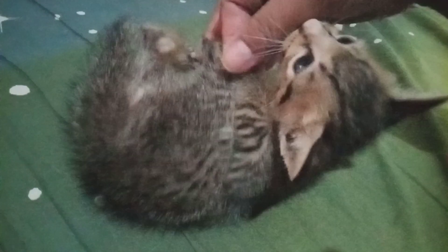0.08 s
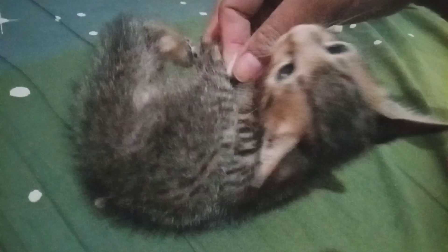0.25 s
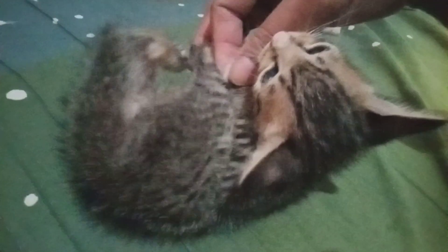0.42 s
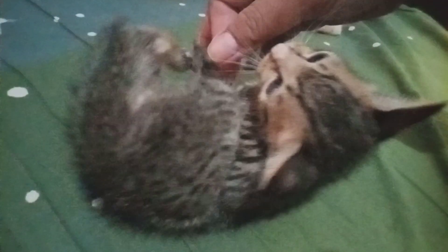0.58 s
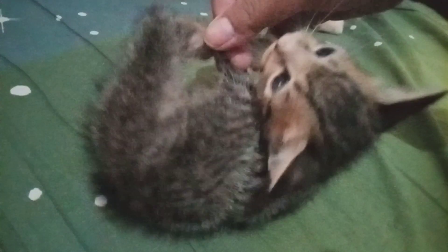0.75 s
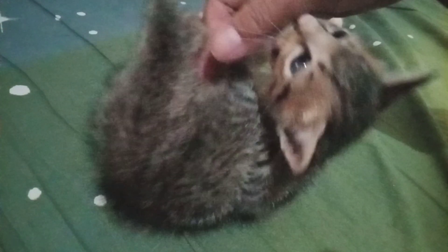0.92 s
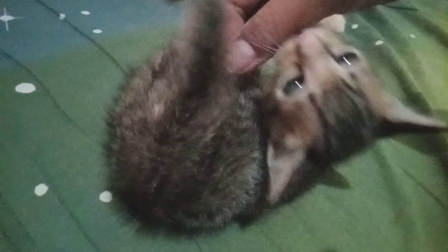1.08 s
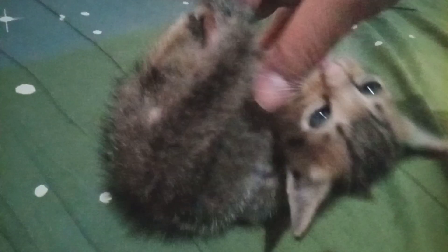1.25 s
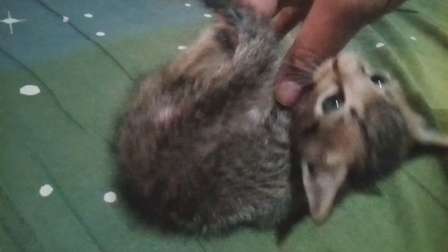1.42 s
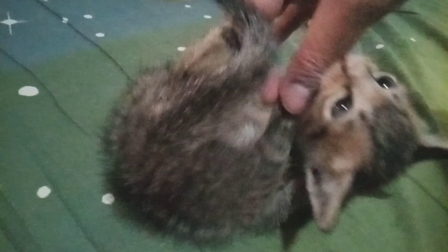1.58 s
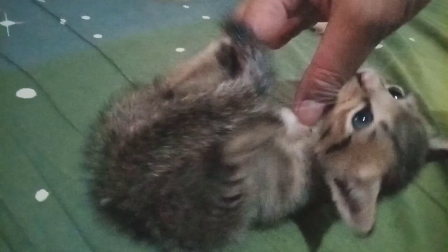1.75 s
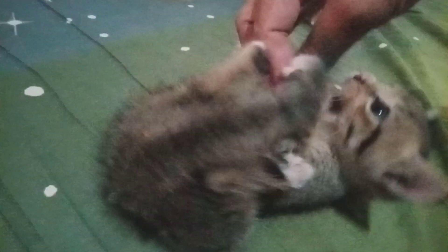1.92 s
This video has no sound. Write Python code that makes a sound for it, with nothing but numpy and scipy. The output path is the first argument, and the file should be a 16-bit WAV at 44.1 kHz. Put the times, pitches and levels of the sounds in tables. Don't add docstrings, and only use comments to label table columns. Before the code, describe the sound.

Soft low bumps and muffled air puffs as a kitten wrestles a hand on bedding

```python
import sys
import numpy as np
from scipy import signal
from scipy.fft import rfft, irfft
from scipy.io import wavfile
from scipy.ndimage import uniform_filter1d

SR = 44100
rng = np.random.default_rng(int(sys.argv[2]) if len(sys.argv) > 2 else 0)


def master(y):
    cut = np.clip(np.atleast_2d(y).T, -1, 1)
    pcm = np.round(cut * 32767)
    wavfile.write(sys.argv[1], SR, pcm.astype(np.int16))


def invert_db(x):
    u = np.asarray(x, float) / 20
    return 10 ** u


N = 88200

# [t/s, level/dB]
GUST_LEVEL = [(0.0, -50.5), (0.1, -49), (0.22, -52.5), (0.27, -46.5), (0.44, -40.5), (0.6, -36.5),
              (0.79, -44), (0.849, -53), (0.909, -42), (1.12, -44), (1.23, -52), (1.279, -49), (1.421, -43),
              (1.54, -47), (1.64, -40), (1.851, -48), (1.891, -62), (1.97, -56)]
# [f/Hz, level/dB per Hz]
PORT_RESPONSE = [(22, -35), (40, -18), (65, -1.5), (130, 0.77), (200, 1.5), (320, -1), (600, -9.5),
                 (1200, -35)]
# [f/Hz, level/dB per Hz]
FAN_LOW_SPECTRUM = [(30, -27), (60, -0.5), (200, -3), (420, -9), (760, -8.5), (940, -11.5), (1150, -5.5),
                    (1500, -8)]
# [f/Hz, level/dB per Hz]
FAN_HIGH_SPECTRUM = [(1500.0, -7), (1900, -13.5), (2400, -14), (3000, -22.5), (3700, -26.5), (4700, -40),
                     (6000, -48.5), (9000, -66)]
# [f/Hz, rms level/dB]
FAN_TONES = [(400, -65.5), (690, -75), (976, -75.5), (1150, -69.5), (1210, -73.5), (1327, -72),
             (1495, -71.5), (1667, -78), (1841, -75), (2010, -79)]
# [f/Hz, level/dB per Hz]
HISS_SPECTRUM = [(4000, -5), (6000, -12.5), (7000, -8), (8300, -1.5), (9600, -10.5), (12000, -17),
                 (15300, -20), (16000, -11.5)]
# [t/s, peak level/dB, f/Hz]
BUMP_EVENTS = [(0.085, -29, 121), (0.263, -29.5, 121), (0.302, -30, 139), (0.352, -32, 108),
               (0.372, -34.5, 123), (0.488, -31, 143), (0.513, -22.5, 162), (0.536, -26, 121),
               (0.57, -25.5, 154), (0.582, -27.5, 143), (0.611, -24.5, 164), (0.639, -26, 169),
               (0.665, -28, 172), (0.813, -27, 122), (0.933, -30, 126), (1.001, -27.5, 111),
               (1.017, -35.5, 132), (1.066, -28, 144), (1.146, -28.5, 83), (1.433, -27, 203),
               (1.453, -21.5, 119), (1.473, -22, 128), (1.484, -23.5, 130), (1.505, -22.5, 126.6),
               (1.605, -28, 102), (1.622, -28, 149), (1.666, -29, 126), (1.683, -32, 136),
               (1.711, -30.5, 111), (1.835, -27, 109.5)]
# [t/s, peak level/dB, f/Hz]
NUDGE_EVENTS = [(0.011, -40.5, 87), (.135, -42.5, 111), (.503, -27, 211), (.679, -29.5, 177),
                (0.709, -36, 168), (1.27, -38.5, 166), (1.321, -36.5, 183), (1.515, -34, 108),
                (1.567, -39.5, 107), (1.642, -27.5, 96), (1.782, -34.5, 114), (1.794, -36, 190),
                (1.862, -35, 165), (1.97, -39, 85)]
# [t/s, peak level/dB, f/Hz]
FLICK_EVENTS = [(0.345, -45.5, 395), (.363, -51.5, 403), (.559, -34, 650), (.566, -37.5, 420),
                (.607, -49, 387), (.624, -42, 423), (0.653, -46.5, 406), (1.073, -45.5, 400),
                (1.472, -35, 470), (1.478, -36, 300), (1.494, -37.5, 290), (1.484, -37, 475),
                (1.501, -34, 613), (1.63, -43.5, 457), (1.834, -43.5, 410)]
# [t/s, level/dB, f/Hz, length/s]
MOAN_EVENTS = [
    (.175, -49.5, 205, 0.053),
    (0.341, -55.5, 344, 0.043),
]
# [t/s, peak level/dB, length/s]
TICK_EVENTS = [
    (1.2783, -60, .0001),
    (1.6536, -74, .001),
    (1.886, -66, 0.0011),
    (1.976, -55, 0.0029),
]
# [f/Hz, level/dB]
TICK_SPECTRUM = [(4000, -30), (6000, -10), (7500, 6), (10000, 0), (15000, -7)]

EDDIES_PER_S, EDDY_CYCLES, EDDY_SPREAD_DB = 500, 1.45, 1.3
EDDY_LOW_HZ, EDDY_HIGH_HZ = 50.2, 460
EDDY_TILT_DB_PER_OCT, BRIGHTEN_PER_OCT = -8, 0.05
CALM_DB, CALM_S = -6.5, 0.0061
FAN_DB, FAN_PATCH_DB, TONE_WIDTH_HZ = -54.5, 0.9, 25
HISS_DB, HISS_FAST_FLICKER_DB, HISS_SLOW_FLICKER_DB = -78, 0.7, 0.23
BUMP_CYCLES, BUMP_DB, BUMP_EDGE_DB = 0.97, -2.5, -8.5
FLICK_CYCLES, FLICK_DB = 1.13, 5.5


def evened(x):
    return x / np.sqrt(np.mean(x ** 2) + 1e-20)


def read(spectrum, hz):
    f, level_db = np.transpose(spectrum)
    return np.interp(np.log(hz + 1), np.log(f + 1), level_db)


def colour(x, spectrum):
    hz = np.fft.rfftfreq(len(x), 1 / SR)
    return irfft(rfft(x) * invert_db(read(spectrum, hz)), len(x))


def add(mix, centre_s, sound):
    at = round(centre_s * SR) - len(sound) // 2
    part = mix[max(at, 0):][:len(sound) + min(at, 0)]
    part += sound[max(-at, 0):][:len(part)]


def wobble(span_s):
    size = max(int(span_s * SR), 2)
    smooth = uniform_filter1d(rng.standard_normal(N), size)
    return evened(uniform_filter1d(smooth, size))


def swirl(hz, cycles, phase):
    u = np.arange(-2048, 2048) / SR * hz
    return np.exp(-2 * (u / cycles) ** 2) * np.cos(2 * np.pi * u + phase)


def eddies():
    t = np.arange(N) / SR
    gust_db = np.interp(t, *np.transpose(GUST_LEVEL))
    strength = invert_db(EDDY_SPREAD_DB * np.minimum(rng.exponential(1, N), 4))
    arrivals = strength * (rng.random(N) < EDDIES_PER_S / SR)
    pitches_hz = np.geomspace(EDDY_LOW_HZ, EDDY_HIGH_HZ, num=24)
    kind = rng.integers(0, len(pitches_hz), N)
    tilt_db_per_oct = EDDY_TILT_DB_PER_OCT + BRIGHTEN_PER_OCT * (gust_db - gust_db.mean())
    out = np.zeros(N)
    for k, hz in enumerate(pitches_hz):
        slope_db = tilt_db_per_oct * max(np.log2(hz / 130), 0)
        pulse = swirl(hz, EDDY_CYCLES, rng.uniform(0, 2 * np.pi)) * np.sqrt(hz / 130)
        out += signal.oaconvolve(arrivals * (kind == k) * invert_db(slope_db), pulse, "same")
    bump_s = np.array([row[0] for row in BUMP_EVENTS])[:, None]
    calm = np.exp(-((t - bump_s) / CALM_S) ** 2).max(axis=0)
    return invert_db(gust_db + CALM_DB * calm) * evened(colour(out, PORT_RESPONSE))


def fan():
    frames, hz = N // 256 + 5, np.fft.rfftfreq(1024, 1 / SR)
    real, imag, patches = rng.standard_normal((frames, 513, 3)).T
    patches = uniform_filter1d(patches, size=6, axis=0)
    patches = evened(uniform_filter1d(patches, size=16, axis=1))
    level_db = read(FAN_LOW_SPECTRUM + FAN_HIGH_SPECTRUM[1:], hz)[:, None]
    spectra = (real + 1j * imag) * invert_db(level_db + FAN_PATCH_DB * patches)
    whirr = signal.istft(spectra, nperseg=1024, noverlap=768)[1][:N]
    out = invert_db(FAN_DB) * evened(whirr)
    t, span_s = np.arange(N) / SR, 0.5 / TONE_WIDTH_HZ
    for tone_hz, db in FAN_TONES:
        waver = wobble(span_s) + 1j * wobble(span_s)
        out += invert_db(db) * (waver * np.exp(2j * np.pi * tone_hz * t)).real
    return out


def hiss():
    flicker_db = HISS_FAST_FLICKER_DB * wobble(0.0032) + HISS_SLOW_FLICKER_DB * wobble(0.016)
    noise = rng.standard_normal(N) * invert_db(flicker_db)
    return invert_db(HISS_DB) * evened(colour(noise, [(2000, -58.5)] + HISS_SPECTRUM))


def bumps():
    out, pushes = np.zeros(N), BUMP_EVENTS + NUDGE_EVENTS
    phases = rng.uniform(0, 2 * np.pi, (len(pushes + FLICK_EVENTS), 2))
    for (s, db, hz), (low_phase, edge_phase) in zip(pushes, phases):
        low = swirl(hz, BUMP_CYCLES, low_phase)
        edge = invert_db(BUMP_EDGE_DB) * swirl(1.8 * hz, BUMP_CYCLES, edge_phase)
        add(out, s, invert_db(db + BUMP_DB) * (low + edge))
    for (s, db, hz), (phase, _) in zip(FLICK_EVENTS, phases[len(pushes):]):
        add(out, s, invert_db(db + FLICK_DB) * swirl(hz, FLICK_CYCLES, phase))
    return colour(out, PORT_RESPONSE)


def moans():
    out, t = np.zeros(N), np.arange(-8192, 8192) / SR
    for s, db, hz, length_s in MOAN_EVENTS:
        envelope = np.exp(-(t / length_s) ** 4)
        add(out, s, invert_db(db) * envelope * np.sin(2 * np.pi * hz * t))
    return out


def ticks():
    out, noises = np.zeros(N), rng.standard_normal((len(TICK_EVENTS), 512))
    t = np.arange(-256, 256) / SR
    for (s, db, length_s), noise in zip(TICK_EVENTS, noises):
        burst = (t >= 0) * np.exp(-(t / length_s) ** 2) * noise
        add(out, s, invert_db(db) * burst / abs(burst).max())
    return colour(out, TICK_SPECTRUM)


def scene():
    mix = eddies() + fan() + hiss() + bumps() + moans() + ticks()
    return mix[None]


def band_limit(x):
    return signal.sosfilt(signal.butter(12, 15480, fs=SR, output="sos"), x)


def record(dry):
    return band_limit(dry)


dry = scene()
out = record(dry)
master(out)
```